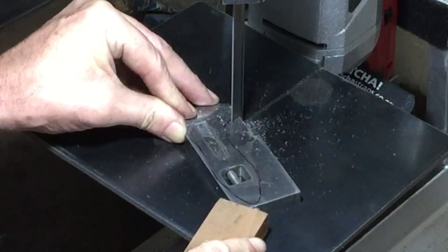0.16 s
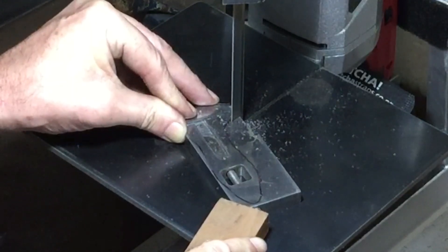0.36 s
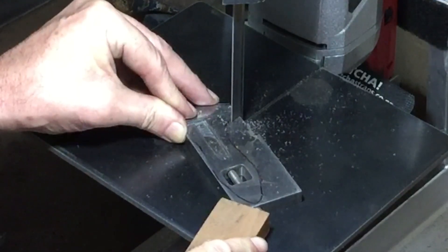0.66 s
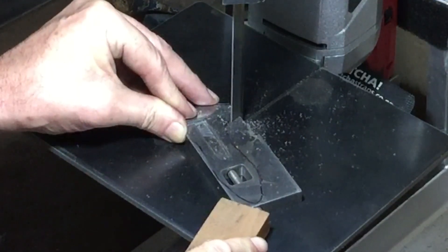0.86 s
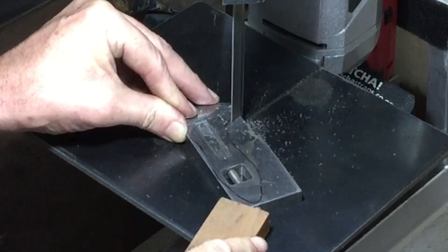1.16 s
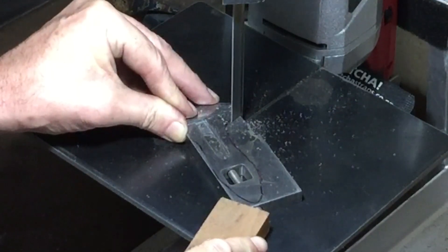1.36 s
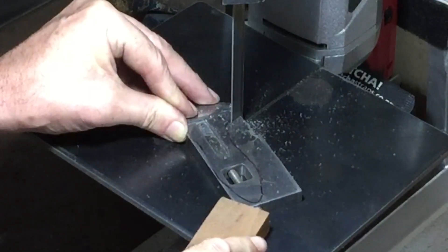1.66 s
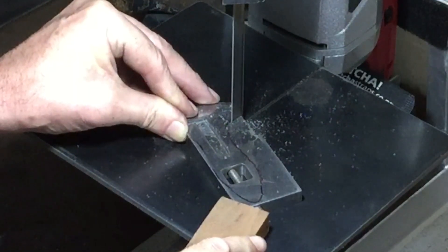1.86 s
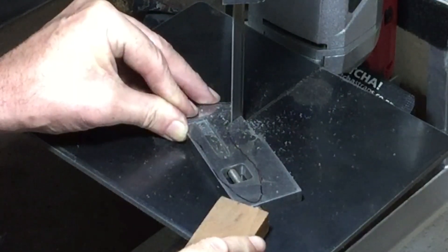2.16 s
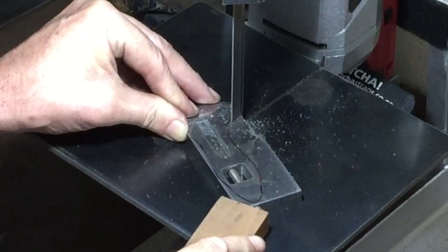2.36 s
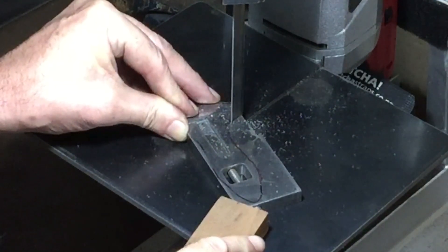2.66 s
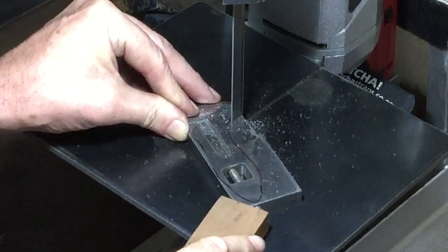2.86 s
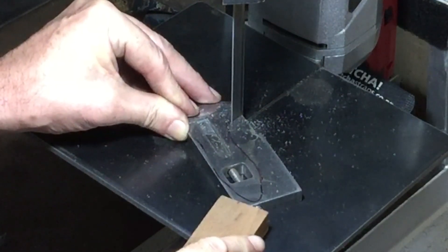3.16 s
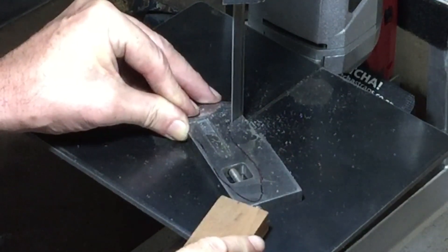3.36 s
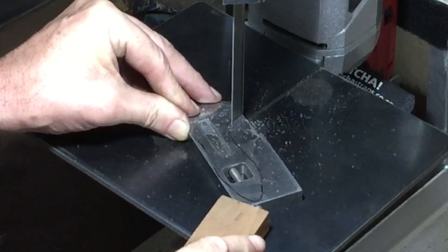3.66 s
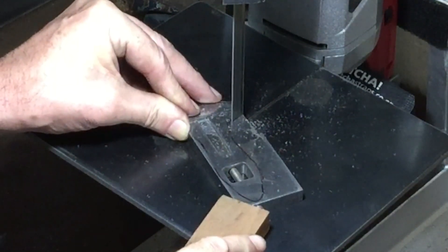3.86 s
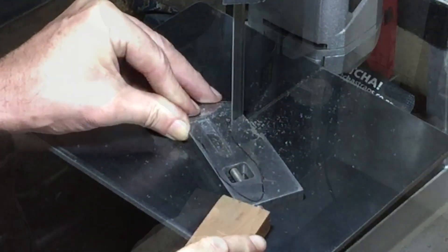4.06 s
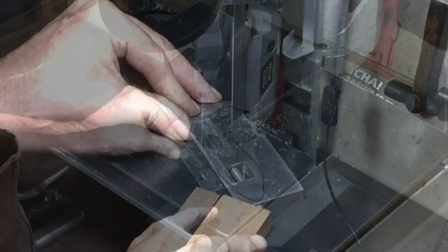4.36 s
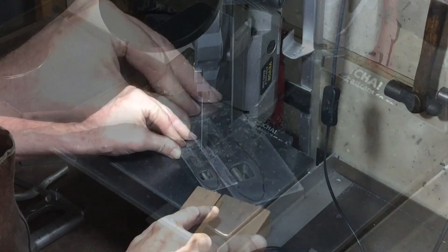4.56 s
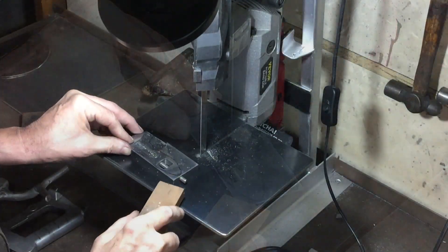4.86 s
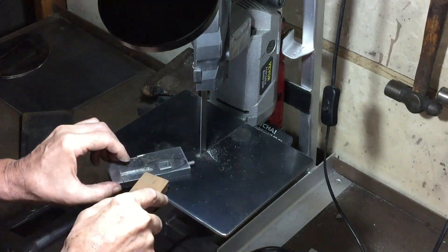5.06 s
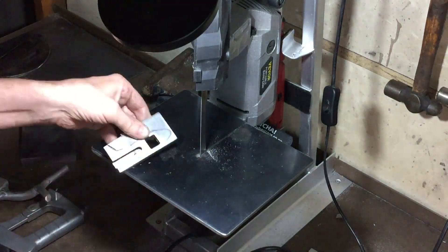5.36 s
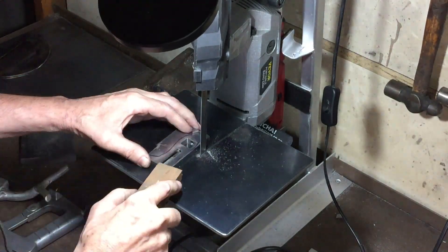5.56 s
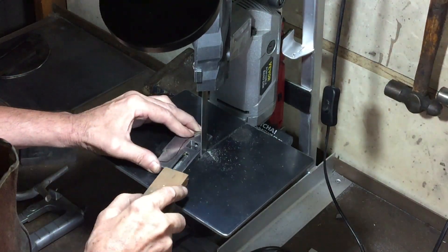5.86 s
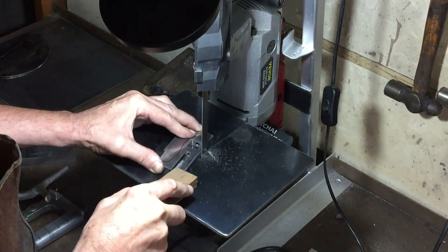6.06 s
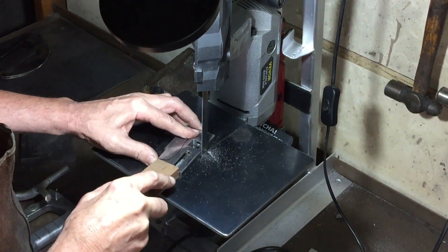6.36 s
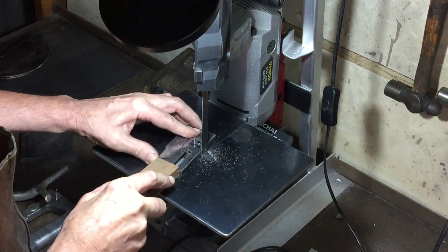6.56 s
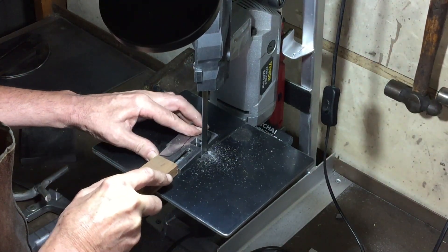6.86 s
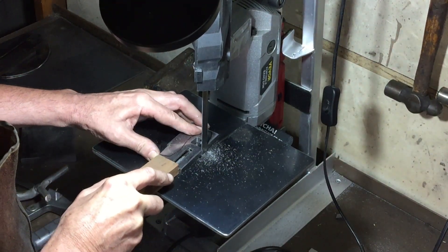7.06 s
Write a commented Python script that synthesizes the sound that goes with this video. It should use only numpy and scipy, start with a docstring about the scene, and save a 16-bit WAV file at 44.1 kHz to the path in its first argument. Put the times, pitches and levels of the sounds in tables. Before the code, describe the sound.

A small bandsaw buzzes and hisses steadily through thin metal, then blends into a shrill sped-up saw whine that sags as a new cut starts.

```python
"""A small bandsaw cuts thin metal close to one microphone: hiss of the teeth shaped by frame ringing,
screech of the work, and a brush motor and gears summed as orders of the armature.
It dissolves into the same saw in fast motion, nine to ten times higher: it idles, the work knocks on
the table as noise scuffs ringing a plate, then a new cut drags the motor down.
Faint sliding squeaks, steady raised mains hum and a faint steady white noise floor lie beneath."""
import sys
import numpy as np
from scipy import signal
from scipy.io import wavfile
from scipy.ndimage import uniform_filter1d

SR = 44100
rng = np.random.default_rng(int(sys.argv[2]) if len(sys.argv) > 2 else 0)


def generate_wav(signal):
    """Clip the signal to [-1, 1] and save it as 16-bit WAV at the path in sys.argv[1]."""
    frames = np.transpose(np.atleast_2d(signal))
    scaled = np.clip(frames, -1, 1) * 32767
    pcm = np.round(scaled).astype(np.int16)
    wavfile.write(sys.argv[1], SR, pcm)


N = 317501
T = np.arange(N) / SR
HOP = 256
FRAMES = N // HOP + 5
HZ, FRAME_S = np.fft.rfftfreq(4 * HOP, 1 / SR), np.arange(FRAMES) * HOP / SR

# Armature speed of the cut. Each row: time in seconds, armature rate in Hz.
SPEED = [(.05, 317.1), (.14, 316), (.29, 315.8), (.36, 314.8), (.55, 314.4), (.71, 314.4), (.82, 316.2),
         (1.64, 316.2), (1.9, 317.7), (2, 318.6), (2.15, 316.2), (2.55, 315.9), (2.73, 318.5), (2.95, 318),
         (3.16, 316.2), (3.38, 316.3), (3.51, 318.5), (3.76, 316.6), (3.84, 315.3), (4.05, 314.3),
         (4.32, 314.3), (4.42, 315), (5, 314.6)]
SHAFT_SHUDDER_TURNS = .0025
RASP_ORDER = .15  # tooth strikes per armature turn


def saw():
    """The cut at normal speed: each tooth strike jolts the blade, modulating hiss, screech and whine."""
    speed_hz = curve(SPEED, T)
    turns = np.cumsum(speed_hz) / SR + SHAFT_SHUDDER_TURNS * wander(rate_hz=15)
    strike = 2 * np.pi * RASP_ORDER * turns + .15 * wander(rate_hz=18)
    rasp = 1 + .014 * np.cos(strike) + .017 * np.cos(2 * strike)
    return rasp * (cutting() + motor_whine(speed_hz, turns, strike)) + gear_train(turns, strike)


# Teeth noise, relative. Each row: frequency in Hz, density in dB per Hz.
HISS = [(18, -70), (30, -51), (174, -17), (239, -10), (355, -15), (426, -8), (499, -12.5), (632, -4.5),
        (780, -8.5), (2350, -3), (2680, -1.5), (3770, -4.5), (4910, -6), (5590, -2), (16000, -24.5)]
# Ringing of frame, table and blade. Each row: frequency in Hz, width in Hz, gain in dB.
BODY = [(204, 45, 5), (434, 60, 0.5), (632, 24, 1), (1220, 420, 5.5), (2620, 360, -7), (3800, 420, 2.5),
        (5630, 290, 2.5), (3790, 90, -2.5), (6700, 150, 3), (7070, 450, 3), (8620, 270, 5), (9400, 200, 6),
        (9750, 260, 4), (3140, 70, 4), (2320, 120, 3), (4860, 70, -9), (5310, 60, -5), (6820, 70, -8),
        (7900, 150, -3), (9040, 90, -3), (10400, 450, -5), (8070, 90, 5), (5030, 100, -3), (7080, 60, -5),
        (2844, 28, 3), (4500, 56, 2), (6600, 69, -2.5), (175, 25, -19), (292, 20, -18), (1510, 80, -3),
        (1700, 60, -3), (1810, 110, 3), (2020, 80, 2), (2250, 50, -5), (2690, 40, 4)]
# Rough stretch of teeth, once per blade loop. Each row: peak in seconds, screech in dB above its rest.
PASSES = [(.66, 8.5), (1.57, 4.5), (2.44, 8.5), (3.318, 8), (4.2, 7.5)]
CUT_HISS_DB, SCREECH_REST_DB = -45, -13.5  # screech is relative to the hiss
BUILD_S, DROP_S = .16, .096
LULL_DB, LULL_AFTER_S, LULL_S = -1, .18, .18


def cutting():
    """Teeth hiss through the frame; the work screeches at each rough pass, then both ease briefly."""
    lull = sum(bump(s + LULL_AFTER_S, DROP_S, LULL_S) for s, _ in PASSES)
    hiss_db = CUT_HISS_DB + LULL_DB * lull
    screech_db = SCREECH_REST_DB + sum(db * bump(s, BUILD_S, DROP_S) for s, db in PASSES)
    field_db = (read(HISS, HZ) + humps(BODY, HZ))[:, None]
    teeth = evened(hiss(field_db, patchy_db=.8, flicker_db=.5, streak_db=2.8))
    return gain_of(hiss_db) * (teeth + gain_of(screech_db) * work_screech())


# Resonances of the thin work. Each row: frequency in Hz, width in Hz, level in dB.
SCREECH = [(2000, 220, 2.5), (2340, 280, 3.5), (2730, 250, -1.5)]


def work_screech():
    """Noise in the resonance bands of the thin work, rms 1."""
    power = sum(gain_of(2 * db) / (1 + (2 * (HZ - f) / width) ** 4) for f, width, db in SCREECH)
    field_db = 10 * np.log10(power)[:, None]
    return evened(hiss(field_db, patchy_db=1, flicker_db=1, streak_db=3))


BARS = 12  # commutator bars per armature turn
WHINE_DB, WHINE_DB_PER_HZ, USUAL_HZ = -55.5, -1.5, 316.2
WHINE_SHAKE = .5


def motor_whine(speed_hz, turns, strike):
    """Commutator bar order, shaken by the teeth; louder as the armature sags below USUAL_HZ."""
    whine_db = WHINE_DB + WHINE_DB_PER_HZ * (speed_hz - USUAL_HZ)
    return gain_of(whine_db) * shaken(turns, BARS, WHINE_SHAKE * np.cos(strike))


# Motor and gear orders. Each entry: multiple of the armature rate.
GEARS = [.158, .395, .49, .79, 1, 1.187, 1.35, 2, 3, 3.75, 4, 4.2, 5, 6, 7, 7.25, 7.68, 11.37, 12.3, 12.78,
         13, 15.6, 17.4, 17.55, 17.76, 19, 20, 20.85, 22.08, 22.655, 24.3, 25.5, 26, 28, 28.08, 29, 31, 35,
         36]
# Their levels. Each entry: level in dB.
GEARS_DB = [-99, -78.5, -83, -69, -76.5, -79, -68, -69, -69, -69, -64, -69, -69.5, -70, -67.5, -70, -70,
            -72, -70, -70, -73, -74, -69, -67, -63, -70, -69.5, -75, -70.5, -73, -78, -75, -77, -75.5, -76,
            -71, -78, -84, -80]
# Upper orders shaken by the teeth. Each row: multiple of the armature rate, level in dB, shake depth.
SHAKEN = [(18, -59, 1.4), (24, -66, .7), (30, -69, .7)]
SLIP_RAD = .3
THROB_ORDER, THROB_PEAK_DB, THROB_DEPTH_DB = 2.135, -62, 14
THROB_EVERY_S, THROB_PEAK_S = .715, .05


def gear_train(turns, strike):
    """Orders of motor and gears: some shaken by the teeth, most wavering freely, one throbbing."""
    out = sum(gain_of(db) * shaken(turns, order, depth * np.cos(strike)) for order, db, depth in SHAKEN)
    for order, db in zip(GEARS, GEARS_DB):
        slip_rad = SLIP_RAD if order < BARS else 0
        out += gain_of(db) * tone(turns, order, rate_hz=18, waver_db=2, slip_rad=slip_rad)
    dip = abs(np.sin(np.pi * (T - THROB_PEAK_S) / THROB_EVERY_S))
    throb = tone(turns, THROB_ORDER, rate_hz=22, waver_db=3.5, slip_rad=SLIP_RAD)
    return out + gain_of(THROB_PEAK_DB - THROB_DEPTH_DB * dip) * throb


# Armature speed in fast motion. Each row: time in seconds, armature rate in Hz.
FAST_SPEED = [(4.85, 3187), (5.2, 3150), (5.68, 3123), (5.8, 3066), (6.02, 2985), (6.12, 2901),
              (6.19, 2892), (6.24, 2934), (6.29, 3020), (6.33, 3043), (6.44, 2911), (6.51, 2858),
              (6.97, 2843), (7.2, 2795)]
FREE_HZ, LOADED_HZ = 3150, 2880  # armature rate with no load, full load
INERTIA_S = .018  # lag of speed behind load
WHEEL_TURNS, WHEEL_S = 140.7, 4.8  # armature turns per band wheel turn; when it runs freest
TUG_TURNS = .11


def fast_saw():
    """The saw in fast motion: load, inferred from speed and its slope, sets hiss and tone levels."""
    speed_hz = uniform_filter1d(curve(FAST_SPEED, T), size=1500)
    slope = uniform_filter1d(np.gradient(speed_hz) * SR, size=1500)
    load = np.clip((FREE_HZ - speed_hz - INERTIA_S * slope) / (FREE_HZ - LOADED_HZ), 0, 1)
    turns = np.cumsum(speed_hz) / SR
    wheel = 2 * np.pi * (turns - np.interp(WHEEL_S, T, turns)) / WHEEL_TURNS
    loop = wheel / 2  # the blade loop is two wheel turns long
    turns += TUG_TURNS * np.sin(loop)  # and tugs the speed up and down
    tones = fast_gears(speed_hz, turns, load) + countershaft(turns, load) + gear_mesh(turns, loop)
    return fast_teeth(load, loop) + tones + mains_hum()


# Idling noise, relative. Each row: frequency in Hz, density in dB per Hz.
IDLE = [(100, -55), (300, -43), (450, -30), (750, -32), (1500, -17), (2500, -11), (4500, -4), (5300, -2.5),
        (8500, 0.5), (12000, 4), (14000, -2), (16000, 0)]
# Cutting noise, relative. Each row: frequency in Hz, density in dB per Hz.
LOADED = [(100, -50), (300, -48), (450, -32.5), (750, -37), (1550, -21.5), (2200, -10.5), (3000, -12),
          (5300, -5), (8500, -4), (11500, 1), (14000, -4), (16000, -3)]
# Ringing in fast motion. Each row: frequency in Hz, width in Hz, gain in dB.
FAST_BODY = [(1830, 180, 10), (4040, 140, 4.5), (4930, 130, 1.5), (5870, 670, 2.5), (6980, 150, -8.5),
             (8700, 57, -5.5), (9300, 400, 0.5), (9600, 370, -1), (12500, 500, 0), (2040, 190, -0.5),
             (1297, 240, 12), (14300, 370, 5), (1560, 190, -9.5), (1940, 39, -3), (2486, 170, -7.5),
             (4490, 190, -9.5), (2330, 89, 9.5), (1110, 92, 5.5), (15650, 210, 4.5), (600, 120, 5.5)]
FAST_HISS_DB, LOOP_SWELL_DB = -46, .8


def fast_teeth(load, loop):
    """Hiss whose spectrum moves from idling to cutting with load and swells once per blade loop."""
    share = np.interp(FRAME_S, T, load)
    field_db = np.outer(read(IDLE, HZ), 1 - share) + np.outer(read(LOADED, HZ), share)
    field_db += humps(FAST_BODY, HZ)[:, None]
    field_db -= 10 * np.log10(np.mean(gain_of(2 * field_db), axis=0))  # equal power in every frame
    teeth = evened(hiss(field_db, patchy_db=.5, flicker_db=.3, streak_db=2.5))
    return gain_of(FAST_HISS_DB + LOOP_SWELL_DB * np.cos(loop + .3)) * teeth


# Orders heard in fast motion. Each entry: multiple of the armature rate.
FAST_GEARS = [.49, .695, 1, 1.187, 2, 3, 4, 5]
# Their levels before the housing. Each row: idling level in dB, cutting level in dB.
FAST_GEARS_DB = [(-97, -79), (-86, -80), (-67.5, -72.5), (-89, -74), (-71, -65), (-66, -64.5), (-69, -58),
                 (-73, -69)]


def fast_gears(speed_hz, turns, load):
    """Gear orders whose levels follow load and the housing resonances they glide through."""
    out = np.zeros(N)
    for order, levels_db in zip(FAST_GEARS, FAST_GEARS_DB):
        gain = by_load(levels_db, load) * gain_of(housing_db(order * speed_hz))
        out += gain * tone(turns, order, rate_hz=60, waver_db=1.3, slip_rad=.08 * order)
    return out


# Housing resonances. Each row: frequency in Hz, width in Hz, gain in dB.
HOUSING = [(2950, 130, 7), (3055, 40, -12), (5640, 150, 3), (6080, 180, 7), (8570, 150, 4.5),
           (8750, 150, -8), (9150, 350, 10), (11250, 150, -9), (11550, 400, 2), (11800, 120, -2),
           (12200, 300, 5), (14700, 500, 8), (2090, 60, 10)]


def housing_db(hz):
    """Housing gain in dB along the frequency curve of a tone."""
    return np.interp(T, T[::HOP], humps(HOUSING, hz[::HOP]))


COUNTERSHAFT_ORDER = .3953  # multiple of the armature rate
SHAFT_DB, SECOND_DB = (-64, -72), (-91, -63.5)  # idling, cutting; the second order before its flutter
BEAT_TURNS, BEAT_S = 124.5, 6.552  # armature turns per jolt; time of one jolt
BEAT_FADE, BEAT_FLOOR = .45, .25  # fade as a share of the beat; gain added under the jolts


def countershaft(turns, load):
    """Countershaft tone plus its second order, which flutters with decaying jolts."""
    first = tone(turns, COUNTERSHAFT_ORDER, rate_hz=23, waver_db=.5, slip_rad=.19)
    beat = (turns - np.interp(BEAT_S, T, turns)) / BEAT_TURNS
    strength = 1.6 - .5 * (beat % 2 > 1)  # every other jolt is weaker
    jolts = strength * np.exp(-(beat % 1) / BEAT_FADE)
    flutter = BEAT_FLOOR + uniform_filter1d(jolts, size=150)
    second = tone(turns, 2 * COUNTERSHAFT_ORDER, rate_hz=60, waver_db=.8, slip_rad=.2)
    return by_load(SHAFT_DB, load) * first + by_load(SECOND_DB, load) * flutter * second


MESH_ORDER, MESH_DB = 1.35, (-78, -63)  # dB before, after contact, without the loop swell
CONTACT_S = (5.62, 5.84)  # the blade takes the work: start, end


def gear_mesh(turns, loop):
    """Gear mesh tone: rises as the blade takes the work, swells once per blade loop."""
    contact = np.interp(T, CONTACT_S, [0, 1])
    mesh = by_load(MESH_DB, contact) * tone(turns, MESH_ORDER, rate_hz=90, waver_db=1.3, slip_rad=.3)
    return mesh * (1 + .35 * np.cos(loop - 1.5))


# Work knocking on the table.
# Each row: start in seconds, peak in dB, scuff length in seconds, treble mode in dB, thud mode in dB.
KNOCKS = [(5.147, -45, 0.005, -15, -19), (5.176, -44, 0.003, -17, -22), (5.205, -44.5, 0.003, -19, -28),
          (5.231, -43.5, 0.003, 16, -30), (5.237, -47, .003, -10, -24), (5.242, -42.5, 0.006, 13, -28),
          (5.256, -54, .004, -10, -6), (5.417, -57, .003, -4, -10), (5.433, -67, .007, -10, 10)]
# Table plate modes. Each row: frequency in Hz, level in dB, t60 in seconds.
PLATE = [(1590, 2, 0.016), (1920, 5, 0.016), (2280, 5, 0.014), (2600, 6, 0.01), (2950, 4, 0.012),
         (3300, -8, .008)]
TREBLE_HZ, TREBLE_T60_S = 5050, .015  # edge of the work
THUD_HZ, THUD_T60_S = 550, .025  # table base
ONSET_S = .0006  # swell-in of the modes


def knocks():
    """Each knock is a short noise scuff ringing the plate, the work edge and the table base."""
    out, t = np.zeros(N), np.arange(2000) / SR
    highpass = signal.butter(4, 380, "high", fs=SR, output="sos")
    for s, peak_db, length_s, treble_db, thud_db in KNOCKS:
        scuff = rng.standard_normal(len(t)) * t * np.exp(-2 * t / length_s)
        modes = PLATE + [(TREBLE_HZ, treble_db, TREBLE_T60_S), (THUD_HZ, thud_db, THUD_T60_S)]
        ring = np.zeros(len(t))
        for k, (f, db, t60_s) in enumerate(modes):
            sign = (-1) ** k  # opposed neighbours keep the bass out
            ring += sign * gain_of(db - 60 * t / t60_s) * np.sin(2 * np.pi * f * t)
        ring *= 1 - np.exp(-t / ONSET_S)
        hit = signal.sosfilt(highpass, signal.fftconvolve(scuff, ring))
        out[round(s * SR):][:len(hit)] += gain_of(peak_db) * hit / abs(hit).max()
    return out


# Faint low squeaks.
# Each row: start in seconds, length in seconds, start frequency in Hz, end frequency in Hz, peak in dB.
SQUEAKS = [(6.12, 0.058, 427, 460, -79), (6.14, 0.17, 430, 580, -88), (6.261, 0.056, 550, 580, -79),
           (6.33, 0.075, 600, 620, -87), (6.66, 0.27, 480, 493, -83), (6.81, .06, 476, 460, -82)]


def squeaks():
    """Soft sines, each sliding linearly in pitch under a Hann envelope."""
    out = np.zeros(N)
    for s, length_s, start_hz, end_hz, db in SQUEAKS:
        hz = np.linspace(start_hz, end_hz, round(length_s * SR))
        squeak = np.hanning(len(hz)) * np.sin(2 * np.pi * np.cumsum(hz) / SR)
        out[round(s * SR):][:len(hz)] += gain_of(db) * squeak
    return out


# Mains hum raised by the fast motion. Each row: frequency in Hz, rms level in dB.
HUM = [(450, -93.5), (900, -89), (1800, -80.5)]


def mains_hum():
    """Steady mains harmonics."""
    return sum(gain_of(db) * np.sqrt(2) * np.sin(2 * np.pi * hz * T) for hz, db in HUM)


def hiss(field_db, patchy_db, flicker_db, streak_db):
    """Random short-time spectra under a dB field: drifting patches, thin ringing streaks, shared flicker."""
    a, b, patches, streaks = rng.standard_normal((FRAMES, len(HZ), 4)).T
    patches = uniform_filter1d(patches, size=10, axis=0)  # across frequency
    patches = evened(uniform_filter1d(patches, size=12, axis=1))  # across time
    streaks = evened(uniform_filter1d(streaks, size=40, axis=1))
    flicker = evened(uniform_filter1d(rng.standard_normal(FRAMES), size=3))
    level_db = field_db + patchy_db * patches + streak_db * streaks + flicker_db * flicker
    spectra = (a + 1j * b) * gain_of(level_db)
    return signal.istft(spectra, nperseg=4 * HOP, noverlap=3 * HOP)[1][:N]


def tone(turns, order, rate_hz, waver_db, slip_rad):
    """One shaft order, rms about 1, whose level and phase waver."""
    phase = 2 * np.pi * (order * turns + rng.random()) + slip_rad * wander(rate_hz)
    return np.sqrt(2) * gain_of(waver_db * wander(rate_hz)) * np.sin(phase)


SHAKE_ANGLE_RAD = 1.2  # 0 shakes level only, pi / 2 mainly phase


def shaken(turns, order, shake):
    """A shaft order whose level and phase are shaken in step with the teeth."""
    phase = 2 * np.pi * (order * turns + rng.random())
    wave = np.sin(phase) + shake * np.sin(phase + SHAKE_ANGLE_RAD)
    return np.sqrt(2) * gain_of(.8 * wander(rate_hz=30)) * wave


def wander(rate_hz):
    """Random curve, rms about 1: straight lines between rate_hz knots per second."""
    knots = rng.standard_normal(4000) * np.sqrt(1.5)  # offsets the loss from interpolation
    return np.interp(T * rate_hz, np.arange(len(knots)), knots)


def bump(s, rise_s, fall_s):
    """A peak of height 1 at time s with its own rise and fall."""
    return np.exp(-((T - s) / np.where(T < s, rise_s, fall_s)) ** 2)


def by_load(levels_db, load):
    """Gain between two dB levels, at load 0 and load 1."""
    return gain_of(levels_db[0] + load * (levels_db[1] - levels_db[0]))


def humps(modes, hz):
    """Sum of resonance humps in dB."""
    return sum(db / (1 + (2 * (hz - f) / width) ** 2) for f, width, db in modes)


def read(points, hz):
    """Spectrum interpolated on a log-frequency axis."""
    f, value = np.transpose(points)
    return np.interp(np.log(hz + 1), np.log(f + 1), value)


def curve(points, t):
    """Straight-line curve through (time, value) points."""
    s, value = np.transpose(points)
    return np.interp(t, s, value)


def gain_of(db):
    """Decibels to gain."""
    return np.exp(np.asarray(db) * (np.log(10) / 20))


def evened(x):
    """Scales to rms 1."""
    return x / np.sqrt(np.mean(x ** 2) + 1e-20)


DISSOLVE_S = (3.96, 5.015)  # start, end


def scene():
    """Linear cross-fade from normal to fast motion, plus knocks and squeaks; both channels equal."""
    fade = np.interp(T, DISSOLVE_S, [0, 1])
    mid = (1 - fade) * saw() + fade * fast_saw() + knocks() + squeaks()
    return np.array([mid, mid])


FLOOR_DB, EDGE_HZ = -89.5, 15700  # noise floor before the band limit


def record(dry):
    """Adds a faint steady white noise floor; a steep lowpass limits the band."""
    heard = dry + gain_of(FLOOR_DB) * rng.standard_normal(N)
    lowpass = signal.firwin(1023, EDGE_HZ, window=("kaiser", 9), fs=SR)
    return signal.oaconvolve(heard, lowpass[None], "same")


dry = scene()
out = record(dry)
generate_wav(out)
```